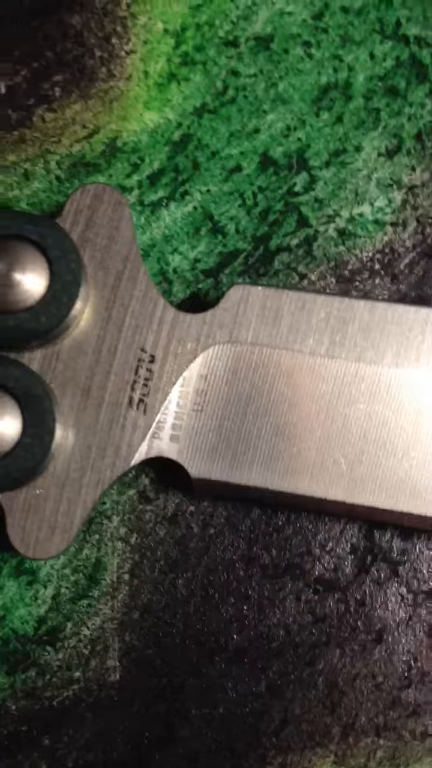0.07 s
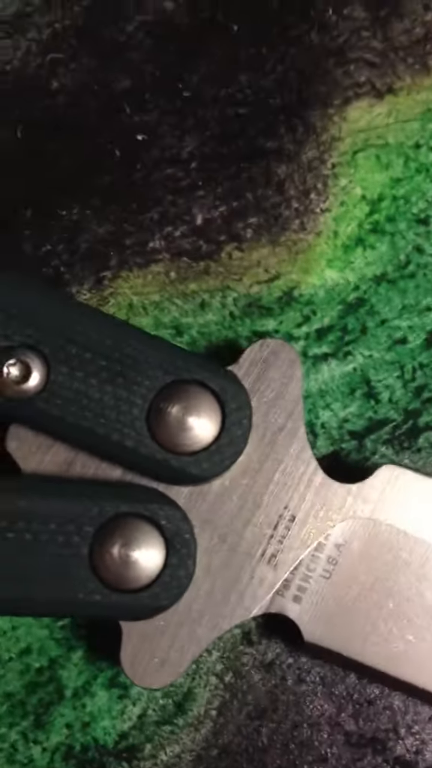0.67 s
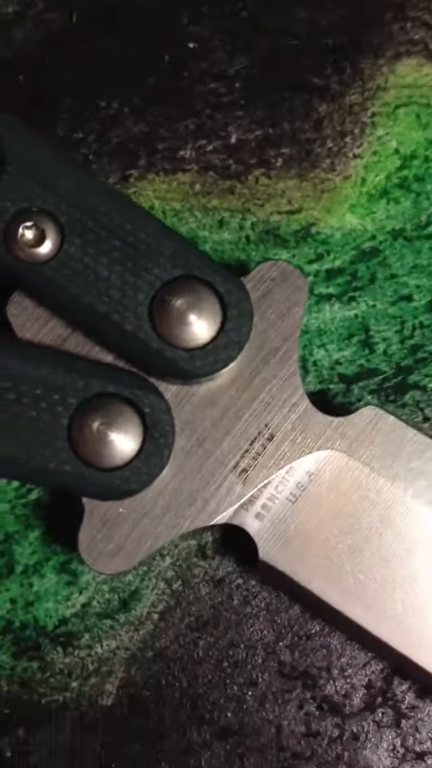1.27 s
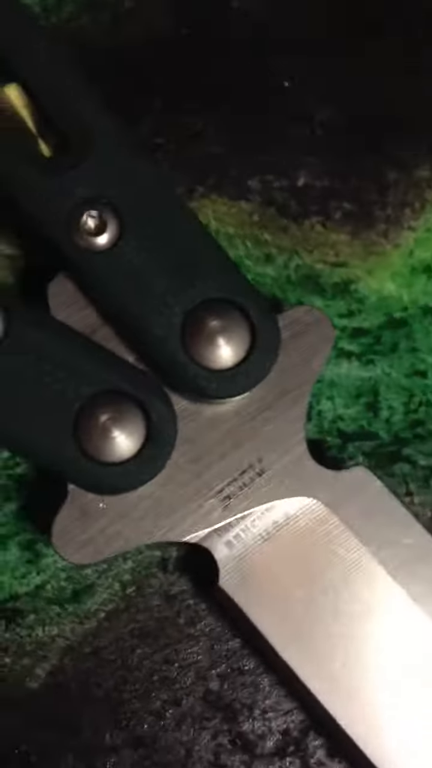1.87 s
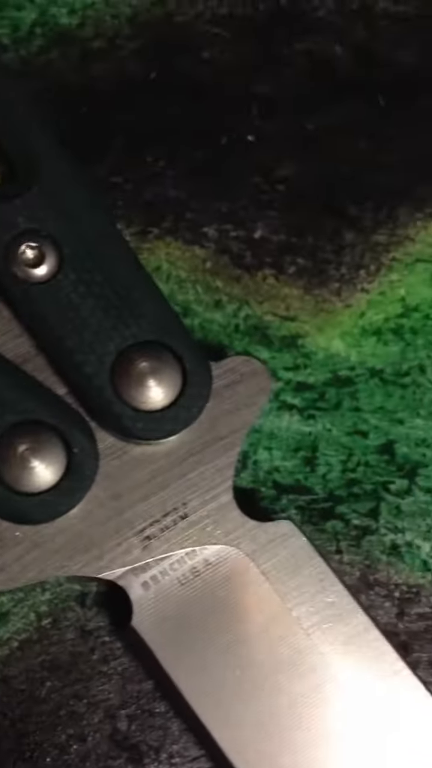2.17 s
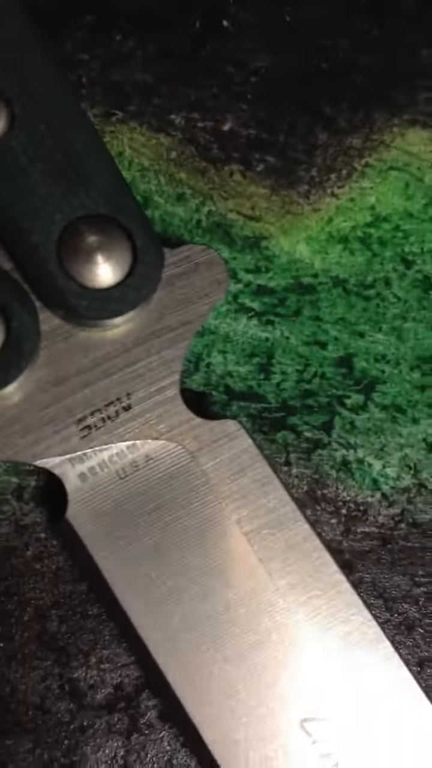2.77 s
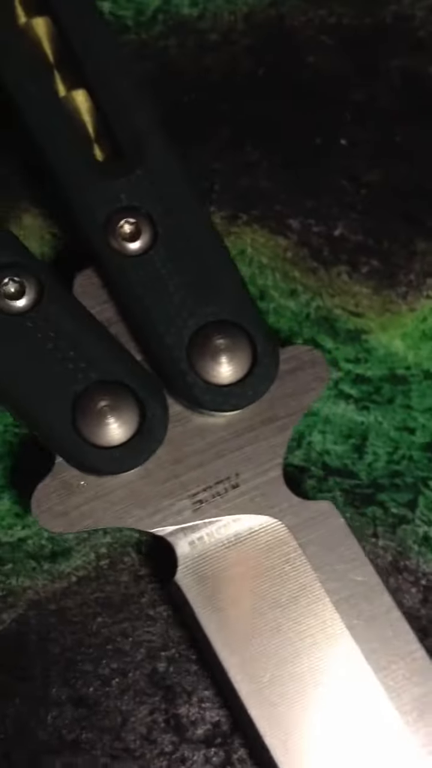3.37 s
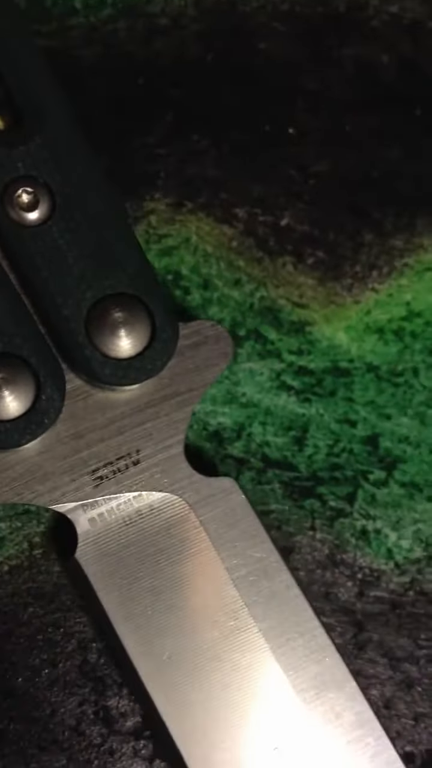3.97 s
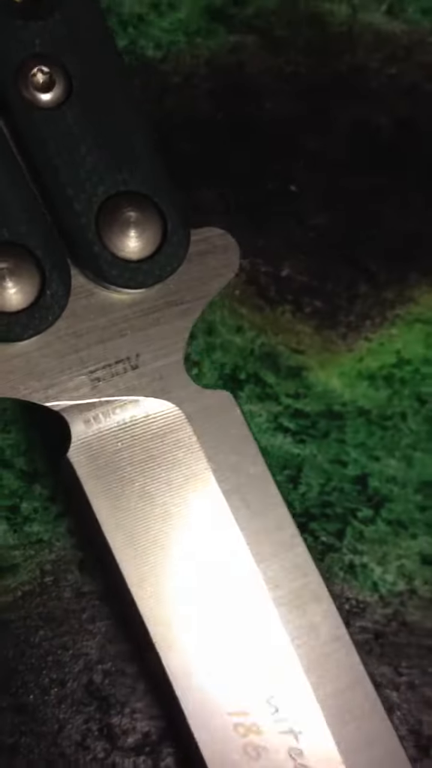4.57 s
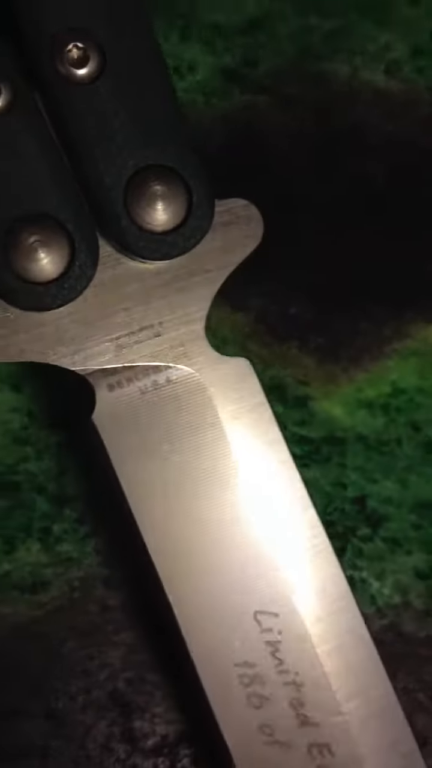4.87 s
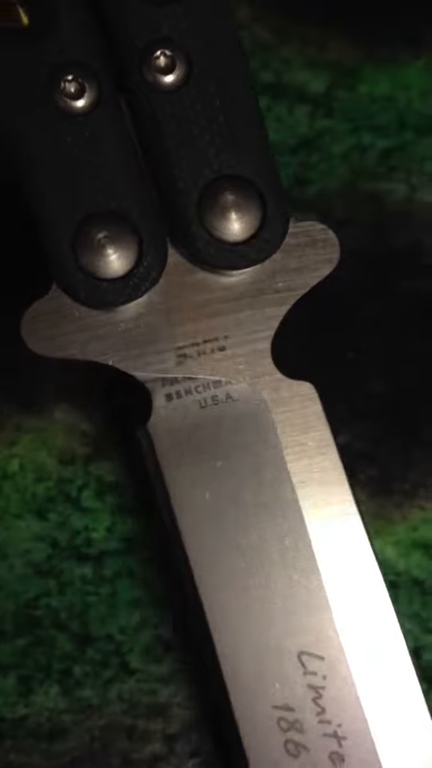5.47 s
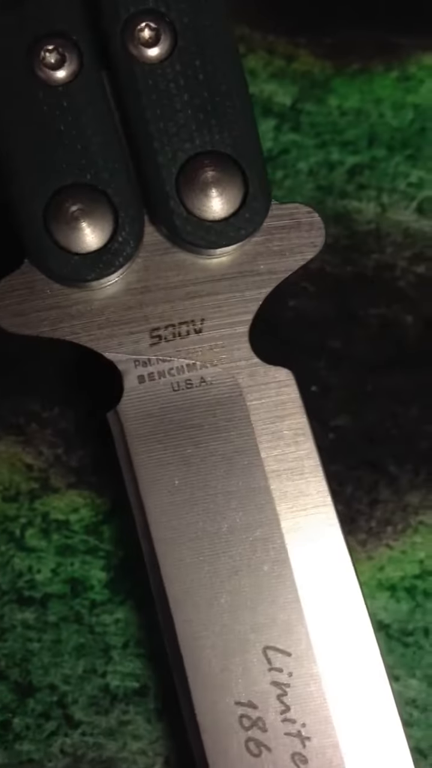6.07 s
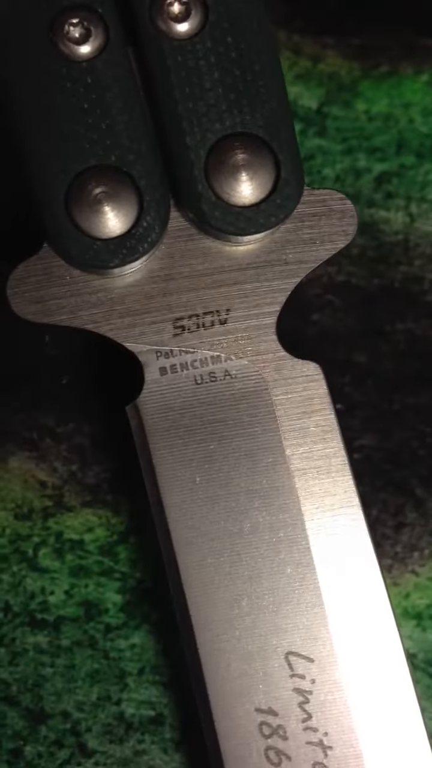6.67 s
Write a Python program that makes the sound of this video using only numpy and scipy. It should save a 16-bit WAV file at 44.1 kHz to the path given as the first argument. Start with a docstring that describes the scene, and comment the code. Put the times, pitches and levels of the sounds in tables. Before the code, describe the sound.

A fingertip pops off the microphone, then a folding knife taps and scrapes on a cloth mat over a faint fan hum.

```python
"""First you hear a fan humming in a quiet room, under a faint microphone hiss.
A fingertip rubs on the microphone's small opening (its port), then peels off with ticks and a pop.
Close by, an open folding knife is turned and shifted on a cloth mat. Its loose handles tap,
and its edge scrapes over the fibres in short gritty strokes, catching with dry clicks."""
import sys
import numpy as np
from scipy import signal
from scipy.fft import rfft, irfft
from scipy.io import wavfile

SR = 44100
rng = np.random.default_rng(int(sys.argv[2]) if len(sys.argv) > 2 else 0)


def generate_wav(sig):
    """Save sig (samples, or channels by samples) to the path in sys.argv[1] as 16-bit PCM at SR."""
    pcm = np.round(np.clip(np.atleast_2d(sig).T, -1, 1) * 32767).astype(np.int16)
    wavfile.write(sys.argv[1], SR, pcm)


N = 296352
TIME = np.arange(N) / SR
LIFT_S = 1.4811   # the fingertip leaves the port
CUTOFF_HZ = 15300   # top of the microphone's range


def from_db(db):
    """Turn decibels into a number to multiply by."""
    return 10 ** (np.asarray(db) / 20)


def rms_one(x):
    """Scale a signal to an average power of 1."""
    return x / np.sqrt(np.mean(x ** 2) + 1e-20)


def with_energy(x, db):
    """Scale a short sound so that its total energy is at this level."""
    return from_db(db) * x / np.linalg.norm(x)


def butter(x, hz, kind, order=2):
    """Keep the "low" or the "high" side of a frequency."""
    sections = signal.butter(order, np.clip(hz, 10, .45 * SR), kind, fs=SR, output="sos")
    return signal.sosfilt(sections, x + 1e-18)


def drift(rate_hz):
    """A random wobble of typical size 1, mostly slower than the given rate."""
    hz = np.fft.rfftfreq(N, 1 / SR)
    return rms_one(irfft(rfft(rng.standard_normal(N)) / (1 + (hz / rate_hz) ** 2), N))


def colour(x, tone, peaks=(), size=32768):
    """Shape a sound with a tone curve and peaks; their levels set only the balance of low and high."""
    hz = np.fft.rfftfreq(size, 1 / SR)
    points = np.array(tone)
    gain = from_db(np.interp(np.log(hz + 1), np.log(points[:, 0]), points[:, 1]))
    for centre, width, boost_db in peaks:
        gain *= 1 + (from_db(boost_db) - 1) / (1 + (2 * (hz - centre) / width) ** 2)
    gain /= np.sqrt(np.mean(gain ** 2 * (hz < CUTOFF_HZ)))
    cepstrum = irfft(np.log(gain))[:size // 2]   # build the filter so that nothing rings early
    cepstrum[1:] *= 2
    response = irfft(np.exp(rfft(cepstrum, size)))[:size // 2]
    return signal.fftconvolve(x, response)[:N]


def brighten(x, bright_db, split_hz=6200):
    """A harder contact moves energy from below the split to above it."""
    hard = from_db(bright_db)
    low, high = butter(x, split_hz, "low", order=3), butter(x, split_hz, "high", order=3)
    return (low + hard * high) / np.sqrt((1 + hard ** 2) / 2)


def add(out, s, sound):
    """Mix a short sound in at s seconds."""
    at = round(s * SR)
    out[at:at + len(sound)] += sound[:N - at]


# tone of the rushing air: f/Hz, level/dB
AIR_TONE = [(25, -45), (55, -32), (75, -47), (105, -11), (160, -5), (200, 0.5), (290, -0.5), (325, -8),
            (500, -10.5), (700, -9.5), (780, -14), (1270, -13.5), (1400, -21), (2500, -34.5)]
# peaks in that rush: f/Hz, width/Hz, boost/dB
AIR_PEAKS = [(199, 9.7, 3.5), (290, 8.3, 4.5), (695, 33, 6.5)]
# notes of the motor and blades: f/Hz, level/dB, wobble rate/Hz
FAN_NOTES = [(83, -90, 2), (133.2, -70, 1.5), (174.5, -71, 2), (237, -73, 4), (343, -81, 3), (555, -81, 2),
             (711, -79, 4), (1203, -87, 5)]
def fan(air_db=-62, waver=0.38):
    """Air rushes through the fan while its motor and blades hum unsteadily."""
    out = from_db(air_db) * colour(rng.standard_normal(N), AIR_TONE, AIR_PEAKS)
    for hz, db, rate_hz in FAN_NOTES:
        wobble = 1 + waver * (drift(rate_hz) + 1j * drift(rate_hz))   # in both loudness and pitch
        note = np.exp(2j * np.pi * (hz * TIME + rng.random()))
        out += from_db(db) * np.real(wobble * note) * np.sqrt(2 / (1 + 2 * waver ** 2))
    return out


# tone of the hiss: f/Hz, level/dB
HISS_TONE = [(500, 4), (2000, 2.5), (3600, 2.5), (5200, -3.5), (7000, -3), (9500, -8), (12000, -4.5),
             (15000, -5)]
# peak and dip of the port, half covered and then free: f/Hz, width/Hz, boost/dB
COVERED_PEAKS = [(3940, 350, 6.5), (4800, 600, -3)]
FREE_PEAKS = [(4650, 650, 4), (4970, 450, -1)]
def hiss(covered_db=-69.5, free_db=-70.5):
    """The microphone's hiss takes on the ring of the port, which is higher once the finger is gone."""
    noise = butter(rng.standard_normal(N), 150, "high")
    covered = colour(noise * (TIME < LIFT_S), HISS_TONE, COVERED_PEAKS)
    free = colour(noise * (TIME >= LIFT_S), HISS_TONE, FREE_PEAKS)
    return from_db(covered_db) * covered + from_db(free_db) * free


# slips of the fingertip: t/s, level/dB, length/s
FINGER_SLIPS = [(0.19,-74,0.14), (.62,-67.5,0.031), (0.818,-71,.03), (1.203,-80,0.045), (1.417,-67,0.063)]
# tone of skin rubbing on the microphone's case: f/Hz, level/dB
RUB_TONE = [(500, -7), (3300, -1), (5500, -13), (8000, 0.5), (11000, 0), (14000, -8)]
# ring of the rubbed port: f/Hz, width/Hz, boost/dB
RUB_PEAKS = [(4160, 220, 19)]
def finger_rub():
    """The resting fingertip slips a little now and then, and the covered port sings."""
    slip = sum(from_db(db) * np.exp(-((TIME - s) / length) ** 2) for s, db, length in FINGER_SLIPS)
    return colour(slip * rng.standard_normal(N), RUB_TONE, RUB_PEAKS)


# the handles hit the base of the blade: t/s, energy/dB, brightness/dB, time between bounces/s
HANDLE_HITS = [(.855, -37.5, 6, .001), (2.1433, -39, 2, .008), (2.197, -26.5, 7, .001),
               (2.2075, -24.5, 5, .001), (2.2783, -18.5, -16, .0143), (2.4425, -40, 0, .0075),
               (2.501, -12.5, -1, .0093), (4.8307, -28.5, 3, .001), (5.28, -42, -11, .006),
               (6.024, -41.5, -3, .019), (6.586, -43, -12, .005)]
# notes the handles ring at: f/Hz, level/dB, time to fade by 60 dB/s
HANDLE_NOTES = [(1660,-14,0.0051), (2590,-0.5,0.0062), (3100,-3,0.0074), (4560,1.5,0.0088),
                (5660,-7.5,0.006), (6300,-8.5,0.0048), (7320,-9,0.0089), (8800,-10,0.008), (10550,-15,0.01),
                (11900,-4.5,0.0065), (13200,-8,0.0056)]
def handle_taps(bounce_loss_db=10.5, vary_db=6.5, chatter=0.19, chatter_s=0.0011):
    """A loose handle lands and bounces twice; the hand quickly stops each ring."""
    out, t = np.zeros(N), TIME[:SR // 25]
    for s, energy_db, bright_db, gap in HANDLE_HITS:
        for bounce in range(3):
            ring = np.zeros(len(t))
            for k, (hz, db, fade_s) in enumerate(HANDLE_NOTES):
                fade = from_db(db + vary_db * rng.standard_normal() - 60 * t / fade_s)
                ring += (-1) ** k * fade * np.sin(2 * np.pi * hz * t)
            contact = chatter * rng.standard_normal(len(t)) * np.exp(-t / chatter_s)
            contact *= rng.random(len(t)) < .3   # thin it out to tiny separate knocks
            contact[0] = 1   # the main hit
            tap = butter(signal.fftconvolve(ring, contact), 200, "high")   # small parts give no bass
            tap_db = energy_db - bounce_loss_db * np.log2(1 + bounce)
            add(out, s + bounce * gap, with_energy(brighten(tap, bright_db), tap_db))
    return out


def snap(decay_s, crumble, rattle, rattle_s):
    """Something stuck lets go: one sharp click, a crumble of smaller ones and a faint rattle."""
    t = TIME[:SR // 40]
    fade = crumble * np.exp(-t / decay_s) + rattle * np.exp(-t / rattle_s)
    burst = fade * rng.standard_normal(len(t))
    burst[0] = rng.choice([-1, 1])
    return burst


# patches of skin snap off the port: t/s, energy/dB
SKIN_SNAPS = [(1.3202, -31), (1.437, -31), (1.475, -21.5)]
# tone of the sticky ticks: f/Hz, level/dB
SKIN_TONE = [(100, -30), (500, -12), (1000, -10), (1500, -15), (2100, -8), (3300, -9.5), (4000, -13),
             (4400, -10.5), (5700, -8), (7200, -9.5), (8700, -1), (10500, -1), (13000, .5), (14500, -14)]
# peak and dip of the port as it opens: f/Hz, width/Hz, boost/dB
OPENING_PEAKS = [(4400, 300, 9), (5050, 400, -9)]
def finger_peel(peel_s=.0955, shrink=.68, first_db=-43.5, growth_db=2.5, tear_db=-7, tear_s=0.00073):
    """Skin creeps on the port, peels in ever quicker, louder ticks, tears free and brushes the rim."""
    away = abs(TIME - LIFT_S)
    creep = from_db(-51) * np.exp(-away / 0.022)
    brush = from_db(-39) * np.exp(-away / 0.0021)
    tear_shape = np.exp(-((TIME - LIFT_S + 0.00035) / tear_s) ** 2)   # just before the lift
    tear = butter(tear_shape * rng.standard_normal(N), CUTOFF_HZ, "low")
    out = np.where(TIME < LIFT_S, creep, brush) * rng.standard_normal(N) + with_energy(tear, tear_db)
    peel_ticks = [(LIFT_S - peel_s * shrink ** k, first_db + growth_db * k) for k in range(12)]
    for s, energy_db in SKIN_SNAPS + peel_ticks:
        tick = snap(decay_s=0.00047, crumble=1.0, rattle=.012, rattle_s=0.0018)
        add(out, s, with_energy(butter(tick, CUTOFF_HZ, "low"), energy_db))
    return colour(out, SKIN_TONE, OPENING_PEAKS)


# soft pushes on the air and the case: t/s, level/dB, f/Hz, length/s
SOFT_PUSHES = [(1.4383, -42, 420, .0018), (1.485, -38.5, 190, .005), (4.0555, -47, 450, .0018),
               (4.064, -42.5, 176, .008)]
def case_bumps():
    """Soft touches rock the case back and forth a few times at most."""
    out = np.zeros(N)
    for s, db, hz, length in SOFT_PUSHES:
        t = TIME - s
        out += from_db(db) * np.exp(-(t / length) ** 2) * np.cos(2 * np.pi * hz * t)
    return out


def port_pop(peak_db=-21, top_hz=650, leak_hz=245, lead_s=0.00014):
    """The lifting finger sucks at the port: one pulse that swings back as air leaks in."""
    suction = np.zeros(N)
    add(suction, LIFT_S - lead_s, -np.ones(1))
    thump = butter(suction, top_hz, "low", order=3)
    pop = butter(thump, leak_hz, "high", order=4)
    return from_db(peak_db) * pop / abs(pop).max()


# the knife slides on the cloth: fastest moment t/s, level/dB, length/s, brightness/dB
KNIFE_STROKES = [(2.152, -57.5, 0.02, -2), (2.208, -56.5, 0.021, 3), (2.281, -53, 0.022, -5),
                 (2.455, -56.5, 0.019, -6), (2.506, -51.5, 0.03, -4), (2.852, -46, 0.028, -1),
                 (3.38, -42.5, 0.046, 0), (3.516, -41, .027, -4), (3.547, -31.5, .009, 1.5),
                 (3.572, -40.5, 0.055, -2), (3.671, -36.5, 0.057, -0.5), (3.789, -40, .036, 2),
                 (3.928, -39.5, 0.034, -1), (4.061, -48.5, 0.073, 1.5)]
# fingers shift their grip on the handles: t/s, level/dB, length/s
GRIP_SHIFTS = [(4.348, -68.5, 0.066), (4.645, -68, .08), (4.88, -72.5, 0.19), (5.413, -71, 0.22),
               (6.036, -66.5, 0.046), (6.587, -67.5, .03)]
def hand_motion(rise_share=.42, roundness=1.7, grip_bright_db=-10):
    """Each stroke or change of grip speeds up and dies away; gives its power and brightness in dB."""
    power, bright_sum = np.full(N, 1e-14), np.zeros(N)
    grips = [(*grip, grip_bright_db) for grip in GRIP_SHIFTS]
    for s, level_db, length, bright_db in KNIFE_STROKES + grips:
        away = np.maximum((s - TIME) / rise_share, (TIME - s) / (1 - rise_share)) / length
        swell = np.exp(-np.minimum(away, 20) ** roundness)   # roundness 1 is pointed, 2 is a bell
        stroke = from_db(level_db) ** 2 * swell
        power += stroke
        bright_sum += stroke * bright_db
    return power, bright_sum / power


def sliding(power, bright_db, grains_per_s=30000, thinning=.42, size_db=3.0, smooth=0.27, judder_db=2.5):
    """Fibres flick past the edge: lone ticks at a crawl, a dense rasp at speed."""
    chance = np.minimum(grains_per_s * (power / power.max()) ** thinning / SR, 1)
    sizes = rms_one(from_db(size_db * np.minimum(rng.exponential(1, N), 4)))
    grit = sizes * rng.choice([-1, 1], N) * (rng.random(N) < chance) / np.sqrt(chance)
    friction = (grit + smooth * rng.standard_normal(N)) / np.hypot(1, smooth)
    judder = rms_one(from_db(judder_db * drift(150)))
    return np.sqrt(power) * brighten(friction * judder, bright_db)


def snags(power, per_s=70, above_db=-53.5, base_db=-29, growth=0.49, spread_db=3, bright_db=-1):
    """Fast sliding snags at random, harder with more speed; gives rows like those of HARD_CATCHES."""
    excess_db = 10 * np.log10(power) - above_db
    energy_db = base_db + growth * excess_db + spread_db * rng.standard_normal(N)
    snagged = (rng.random(N) < per_s / SR) & (excess_db > 0)
    return [(s, db, bright_db) for s, db in zip(TIME[snagged], energy_db[snagged])]


# the knife catches hard: t/s, relative energy/dB, brightness/dB
HARD_CATCHES = [(2.1787, -28, -5), (2.8346, -21, 10), (2.88, -27, -4), (3.3362, -39, 4), (3.3952, -19, -2),
                (3.528, -10, 3), (3.5405, -2, 4), (3.5444, -5.5, 0), (3.554, -7, 7), (3.6622, -11, -10),
                (3.788, -11.5, 5), (3.793, -9, 1.5), (3.9258, -22, 1), (4.0285, -29, 0), (4.0992, -26, 7)]
def catching(power):
    """The edge catches on the cloth and snaps free with a dry click."""
    out = np.zeros(N)
    for s, energy_db, bright_db in HARD_CATCHES + snags(power):
        release = snap(decay_s=0.00039, crumble=0.18, rattle=0.06, rattle_s=0.0059)
        click = butter(brighten(release, bright_db), CUTOFF_HZ, "low")
        add(out, s, with_energy(click, energy_db))
    return out


# tone of the scraping: f/Hz, level/dB
SCRAPE_TONE = [(60, -33), (160, 5), (400, -6.5), (900, -5.5), (1600, -3), (2100, 1), (3000, 2.5), (4000, 2),
               (5200, -4.5), (6500, 1), (10000, 1), (13000, 2.5), (15000, -5)]
# where the knife and the case ring: f/Hz, width/Hz, boost/dB
BODY_PEAKS = [(1990, 160, 4), (2272, 40, 6), (2380, 50, 7), (2510, 50, 4), (2755, 50, 4), (3440, 120, 4),
              (4490, 80, 6), (4750, 190, 9), (8085, 70, 5), (11400, 350, 4)]
def knife_scrape(catch_db=-4.0):
    """Sliding and catching shake the same knife, so they share its ring."""
    power, bright_db = hand_motion()
    shaking = sliding(power, bright_db) + from_db(catch_db) * catching(power)
    return colour(shaking, SCRAPE_TONE, BODY_PEAKS)


def room(x, echo_db=-19, wall_hz=7000, fade_s=0.2):
    """The walls send back a faint, short wash of echoes."""
    t = TIME[:SR // 2]
    tail = butter(rng.standard_normal(len(t)), wall_hz, "low", order=1)
    tail *= from_db(-60 * t / fade_s) * (t > .004)
    return x + signal.fftconvolve(x, with_energy(tail, echo_db))[:N]


def scene():
    """Fan, hiss, finger and knife meet at one microphone."""
    background = fan() + hiss()
    finger = room(finger_peel(), echo_db=-33, wall_hz=11000) + finger_rub() + port_pop()
    knife = room(handle_taps() + knife_scrape())
    return (background + finger + case_bumps() + knife)[None]


def record(dry):
    """The very highest treble is cut off steeply."""
    return signal.sosfilt(signal.ellip(10, .2, 80, CUTOFF_HZ, fs=SR, output="sos"), dry)


dry = scene()
out = record(dry)
generate_wav(out)
```